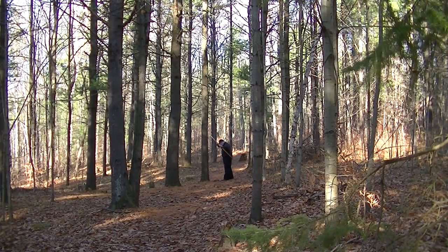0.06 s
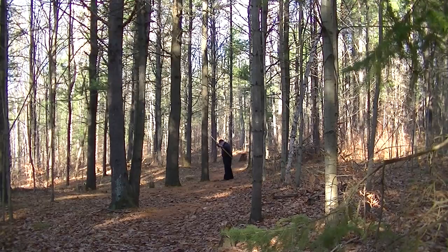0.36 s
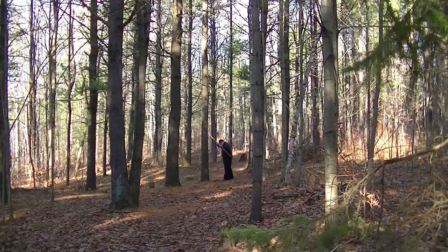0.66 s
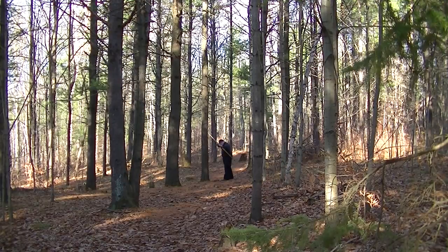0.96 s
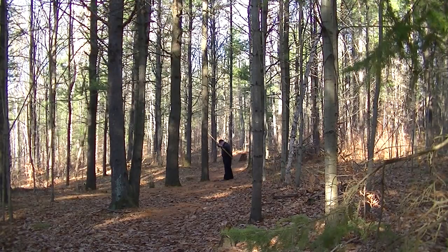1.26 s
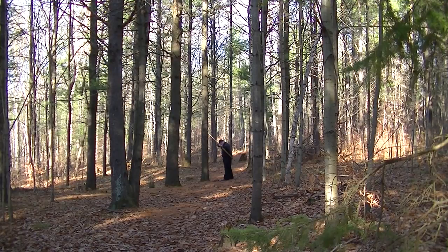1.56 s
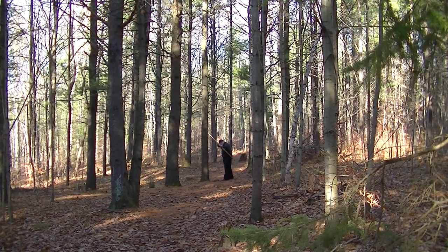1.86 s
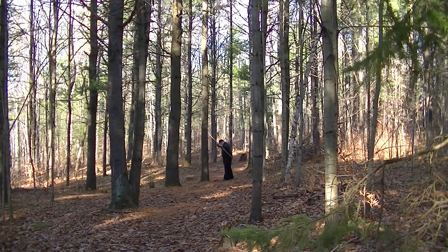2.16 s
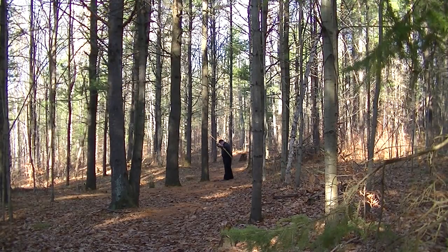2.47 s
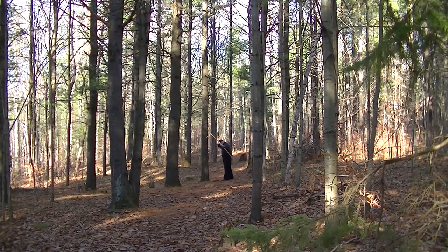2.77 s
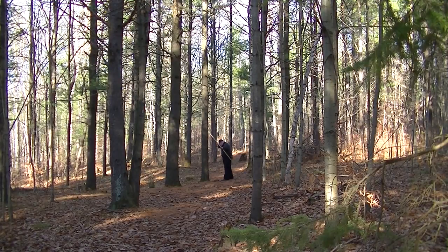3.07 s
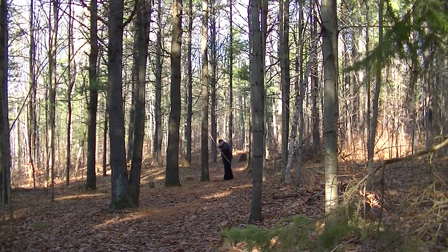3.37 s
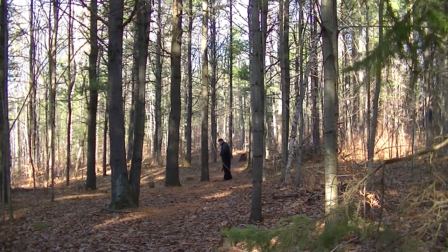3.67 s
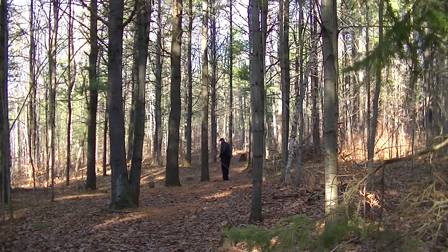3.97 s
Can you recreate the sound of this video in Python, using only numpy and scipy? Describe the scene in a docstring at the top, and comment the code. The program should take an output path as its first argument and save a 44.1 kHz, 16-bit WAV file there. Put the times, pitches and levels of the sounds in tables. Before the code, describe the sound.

An arrow is shot into a target in a forest. At first there is only faint wind, with a low hum, a far drone and barely audible bird peeps. At about 2.5 seconds a distant bowstring snaps sharply, and the arrow hisses and whistles closer. At 3 seconds it hits beside the microphone with a much louder crack, a brief shaft rattle and ringing, echoing off the trunks and fading.

```python
"""A pine wood. A far archer shoots at a target beside the microphone.
Faint wind, a low hum, a far drone, dry leaf ticks and thin bird peeps lie underneath.
The release ticks and the string snaps home, ringing the bow. The vanes hiss and whistle closer
for half a second; the point cracks into the target, the shaft rattles and tones ring on.
The trunks scatter both snap and hit."""
import sys
import numpy as np
from scipy import signal
from scipy.fft import rfft, irfft, next_fast_len
from scipy.io import wavfile

SR = 44100
rng = np.random.default_rng(int(sys.argv[2]) if len(sys.argv) > 2 else 0)


def wav_out(sig):
    """Save sig, one row per channel (or a flat mono array), as 16-bit PCM at SR to the path in sys.argv[1]."""
    wavfile.write(sys.argv[1], SR, np.round(np.clip(np.atleast_2d(sig).T, -1, 1) * 32767).astype(np.int16))


N = 176400
T = np.arange(N) / SR

# wind in the crowns: freq_hz, gain_db
WIND_SPECTRUM = [(22, -26), (40, -10.5), (62, -6.5), (80, -3), (100, -2), (125, 0), (190, -7), (290, -4),
                 (390, -5.5), (550, -4), (900, -7), (1400, -14), (2200, -26.5), (4000, -49), (15000, -63)]
# wind envelope: time_s, level_db
WIND_ENVELOPE = [(0, -47.5), (.7, -48), (1.4, -48), (2.0, -48), (2.6, -48), (3.2, -49.5), (3.6, -48.5),
                 (4, -49)]
# fine steady hiss: freq_hz, gain_db
AIR_SPECTRUM = [(60, -27), (500, -7.5), (2000, 4.5), (4500, 0), (7000, -4), (10000, -8), (15500, -14)]
# hum envelope: time_s, level_db
HUM_ENVELOPE = [(0, -68), (.7, -58), (1.5, -58), (2.2, -64.5), (2.8, -61.5), (3.55, -53.5), (4, -68)]
# drone partials: pitch_hz, level_db
DRONE_PARTIALS = [(253.0, -63), (301.5, -65.5), (452.2, -60), (489.9, -59.5), (597.5, -64.5), (904.4, -72)]
# drone fade: time_s, gain_db
DRONE_ENVELOPE = [(0, 3), (1.3, 1.5), (2.2, -11), (4, -21)]
# leaf ticks: start_s, level_db
TICKS = [(.653, -61), (.674, -60), (2.642, -51), (2.659, -51), (2.842, -55), (3.152, -55), (3.377, -55),
         (3.933, -59)]
# dry leaf: freq_hz, gain_db
LEAF_SPECTRUM = [(1500, -12), (4000, 5), (7000, 3), (10000, -9), (15000, -23)]
# bird peeps: centre_s, level_db
BIRD_PEEPS = [(.88, -74), (1.05, -75), (1.36, -68), (2.13, -73), (3.35, -73), (3.58, -76)]

# release tick: freq_hz, gain_db
RELEASE_SPECTRUM = [(1000, -19), (2500, 3), (3500, -7), (6000, -2), (7500, -16), (15000, -35)]
# string slamming home: start_s, level_db
STRING_BLOWS = [(2.5186, -31), (2.5194, -18.5)]
# bow modes: pitch_hz, gain_db, t60_s
BOW_MODES = [(1140, -8.5, 0.014), (1530, -4, 0.016), (1800, -4, 0.0096), (2300, -9, .009),
             (3080, -12, .008), (4170, -11, 0.0097), (5540, -9, 0.0089), (6950, -16, .008),
             (9500, -26, .004)]
# scattered snap: freq_hz, gain_db
BOW_ECHO_SPECTRUM = [(500, -27), (900, -5), (1200, -2.5), (1550, 1), (1900, -1), (2800, -1.5), (3700, -5),
                     (4600, -3), (5700, -7), (7500, -16.5), (10000, -27), (15000, -40)]
# vane hiss: freq_hz, gain_db
HISS_SPECTRUM = [(300, -21), (900, -5), (2000, 0), (3000, 0), (3700, -3), (4800, 0), (6500, -2.5),
                 (8000, -11.5), (11000, -19), (15000, -28)]
# vane whistles: pitch_hz, gain_db
VANE_WHISTLES = [(1110, -0.5), (1515, -4), (2440, -9.5), (3050, -14)]

# point breaks the face, then bites: delay_s, level_db
POINT_BLOWS = [(0, 3), (.00075, -9)]
# target modes: pitch_hz, gain_db, t60_s
TARGET_MODES = [(135, -17, 0.031), (255, -11.5, 0.018), (497, -16.5, 0.016), (900, -2, 0.0055),
                (2050, 3, 0.0046), (2660, 0, 0.0032), (3120, -7, 0.006), (5000, -18, .003),
                (7700, -23.5, .003), (10600, -31, 0.0018), (13800, -34, .0015)]
# ringing tones after the hit, the shaft and its close echoes: pitch_hz, gain_db, t60_s
HIT_RING_MODES = [(482, -45, .12), (690, -48, .28), (1535, -44, .25), (1690, -41, 0.22), (1860, -41, .22),
                  (1950, -34, .12), (2230, -46, .2), (2810, -49, .22), (3380, -48, .16)]
# shaft rattle: freq_hz, gain_db
RATTLE_SPECTRUM = [(80, -1), (170, 5), (330, -12), (500, 10.5), (1100, 1), (2000, 0), (3500, -5),
                   (5700, -2.5), (7000, -9.5), (10000, -23), (15000, -37)]
# hit echoes off the nearest trunks: arrival_s, level_db
TRUNK_ECHOES = [(3.0366, -7), (3.0440, -13), (3.0495, -8.5), (3.0612, -6.5), (3.0725, -7), (3.0778, -21),
                (3.0980, -14), (3.1100, -12)]
# scattered hit: freq_hz, gain_db
HIT_ECHO_SPECTRUM = [(70, -20), (170, -6.5), (330, -8), (640, -2.5), (1100, -6), (1500, -2), (1900, 2),
                     (2600, -8), (3300, -6), (3900, -14.5), (5400, -16.5), (6800, -38), (15000, -58)]
# stereo balance at full lean: freq_hz, left_minus_right_db
BALANCE = [(200, 4), (700, 3), (1300, 3.5), (2400, 1), (15000, 0.5)]

RELEASE_S, HIT_S = 2.5005, 3.0087
ARROW_M_PER_S, TARGET_DISTANCE_M = 72, 1.44


def from_db(db):
    """Decibels to gain."""
    return 10 ** (np.asarray(db) / 20)


def unit_rms(x):
    """Scale to RMS 1."""
    return x / np.sqrt(np.mean(x ** 2) + 1e-20)


def envelope(points):
    """Gain over time from (time_s, level_db) points."""
    return from_db(np.interp(T, *np.transpose(points)))


def coloured(x, spectrum):
    """Minimum-phase filter through (freq_hz, gain_db) points; keeps the power of white noise."""
    size = next_fast_len(N + SR // 2, True)
    hz, db = np.transpose(spectrum)
    grid_hz = np.maximum(np.arange(size // 2 + 1) * SR / size, 1)
    gain = unit_rms(from_db(np.interp(np.log(grid_hz), np.log(hz), db)))
    cepstrum = irfft(np.log(gain), size)
    cepstrum[1:size // 2] *= 2
    cepstrum[size // 2 + 1:] = 0
    return irfft(rfft(x, size) * np.exp(rfft(cepstrum)), size)[..., :N]


def lowpass(x, cutoff_hz):
    """First-order low-pass."""
    return signal.sosfilt(signal.butter(1, cutoff_hz, fs=SR, output="sos"), x)


def noise(width):
    """Stereo white noise; width is the side gain."""
    mid, side = rng.standard_normal((2, N))
    return mid + width * side * np.array([[1], [-1]])


def narrowband(hz, width_hz):
    """Noise twice through one resonance, RMS 1."""
    radius = np.exp(-np.pi * width_hz / SR)
    poles = [1, -2 * radius * np.cos(2 * np.pi * hz / SR), radius * radius]
    return unit_rms(signal.sosfilt([[1, 0, -1] + poles] * 2, rng.standard_normal(N + SR))[SR:])


def tone(hz, waver_hz):
    """Sine with randomly wavering pitch, RMS 1."""
    pitch_hz = hz + waver_hz * narrowband(40, width_hz=130)
    return np.sqrt(2) * np.sin(2 * np.pi * np.cumsum(pitch_hz) / SR)


def burst(start_s, t60_s):
    """Instant attack, exponential decay."""
    return (T >= start_s) * from_db(-60 * np.maximum(T - start_s, 0) / t60_s)


def impulses(rows):
    """One impulse per (start_s, level_db) row."""
    train = np.zeros(N)
    for start_s, db in rows:
        train[int(start_s * SR)] += from_db(db)
    return train


def ring(blows, modes):
    """Blows excite damped sines of alternating sign."""
    t = T[:SR // 2]
    response = sum((-1) ** k * from_db(db - 60 * t / t60_s) * np.sin(2 * np.pi * hz * t)
                   for k, (hz, db, t60_s) in enumerate(modes))
    return signal.fftconvolve(blows, response)[:N]


def wind(air_db=-62.5):
    """Wind in the crowns, plus a fine steady hiss."""
    crowns = envelope(WIND_ENVELOPE) * coloured(noise(width=0.13), WIND_SPECTRUM)
    return crowns + from_db(air_db) * coloured(noise(width=0.31), AIR_SPECTRUM)


def hum(pitch_hz=81.3):
    """A low hum comes and goes."""
    return envelope(HUM_ENVELOPE) * narrowband(pitch_hz, width_hz=7.6)


def drone():
    """A far drone wavers and fades."""
    partials = sum(from_db(db) * narrowband(hz, width_hz=6.8) for hz, db in DRONE_PARTIALS)
    return envelope(DRONE_ENVELOPE) * partials


def leaves():
    """Dry leaves tick: short, bright noise bursts."""
    ticks = sum(from_db(db) * burst(start_s, t60_s=0.03) for start_s, db in TICKS)
    return coloured(noise(width=0.19) * ticks, LEAF_SPECTRUM)


def bird(pitch_hz=7000, rise_hz_per_s=7300, half_length_s=0.028):
    """A small bird's thin rising peeps."""
    peeps = np.zeros(N)
    for centre_s, db in BIRD_PEEPS:
        offset_s = T - centre_s
        swell = np.exp(-np.minimum((offset_s / half_length_s) ** 2, 20))
        peeps += from_db(db) * swell * tone(pitch_hz + rise_hz_per_s * offset_s, waver_hz=90)
    return peeps


def bow(release_db=-46, slap_s=0.0168, slap_db=-4, echo_db=-41):
    """The release ticks, the string slams home and rings the bow, the trunks answer."""
    tick = noise(width=0.29) * burst(RELEASE_S, t60_s=0.05)
    release = from_db(release_db) * coloured(tick, RELEASE_SPECTRUM)
    snap = ring(impulses(STRING_BLOWS), BOW_MODES)
    slap = from_db(slap_db) * lowpass(np.interp(T - slap_s, T, snap), cutoff_hz=2200)   # off one trunk
    echo = from_db(echo_db) * trunk_scatter(STRING_BLOWS[1][0], BOW_ECHO_SPECTRUM, spread_s=0.25)
    return release + snap + slap + echo


def trunk_scatter(start_s, spectrum, spread_s, echoes_per_s=9000, treble_loss_db_per_s=14):
    """Dense small echoes off trunks; they weaken with the path squared, the treble sooner."""
    age_s = np.maximum(T - start_s, 0)
    arrivals = unit_rms(noise(width=0.15) * (rng.random(N) < echoes_per_s / SR))
    echoes = coloured(arrivals * (T > start_s) / (1 + age_s / spread_s) ** 2, spectrum)
    lows = lowpass(echoes, cutoff_hz=3100)
    return lows + (echoes - lows) * from_db(-treble_loss_db_per_s * age_s)


def arrow_flight(hiss_db=-38, flutter_db=1.5, flutter_hz=5.7, whistle_db=-36.5, swell_s=0.032):
    """The vanes hiss, rising as 1/distance, and whistle over the last metres until the arrow stops."""
    to_go_s = np.maximum(HIT_S - T, 0)
    flying = (T > STRING_BLOWS[0][0]) * from_db(-60 * np.maximum(T - HIT_S, 0) / 0.03)
    nearness = TARGET_DISTANCE_M / (TARGET_DISTANCE_M + ARROW_M_PER_S * to_go_s)
    flex_db = flutter_db * np.cos(2 * np.pi * flutter_hz * to_go_s)   # the arrow flexes
    hiss = from_db(hiss_db + flex_db) * nearness * coloured(noise(width=0.1), HISS_SPECTRUM)
    whistle = sum(from_db(whistle_db + db) * tone(hz, waver_hz=15 * hz / VANE_WHISTLES[0][0])
                  for hz, db in VANE_WHISTLES)
    return flying * (hiss + whistle * np.exp(-to_go_s / swell_s))


def target_hit(thump_hz=75, thump_db=-34.5, thump_t60_s=0.029, rattle_db=-23.5, echo_db=-24.5):
    """The point cracks into the target, the shaft rattles, tones ring on, the trunks echo."""
    blows = impulses([(HIT_S + delay_s, db) for delay_s, db in POINT_BLOWS])
    crack = ring(blows, TARGET_MODES)
    thump = ring(blows, [(thump_hz, thump_db, thump_t60_s)])   # the whole target gives way
    ringing = ring(blows, HIT_RING_MODES)
    shake = noise(width=0.14) * burst(HIT_S + 0.004, t60_s=0.075)
    rattle = from_db(rattle_db) * coloured(shake, RATTLE_SPECTRUM)
    near_echoes = coloured(impulses(TRUNK_ECHOES), HIT_ECHO_SPECTRUM)
    scatter = from_db(echo_db) * trunk_scatter(HIT_S + 0.0088, HIT_ECHO_SPECTRUM, spread_s=0.076)
    return crack + thump + ringing + rattle + near_echoes + scatter


def lean_left(stereo, share):
    """Shift the lows to the left by a share of BALANCE."""
    return np.array([coloured(channel, [(hz, sign * share * db / 2) for hz, db in BALANCE])
                     for channel, sign in zip(stereo, (1, -1))])


def scene():
    """The shot over the wood's own sounds."""
    shot = bow() + arrow_flight() + target_hit()
    ambience = wind() + hum() + drone() + leaves() + bird()
    return lean_left(shot, share=0.69) + lean_left(ambience, share=1)


def record(dry, low_cut_hz=24, high_cut_hz=16500):
    """The microphone drops the deepest bass, the crack overloads the recorder, the top is cut."""
    heard = signal.sosfilt(signal.butter(2, low_cut_hz, "high", fs=SR, output="sos"), dry)
    clipped = heard / (1 + heard ** 4) ** 0.25
    return signal.sosfilt(signal.cheby2(16, 60, high_cut_hz, fs=SR, output="sos"), clipped)


dry = scene()
out = record(dry)
wav_out(out)
```